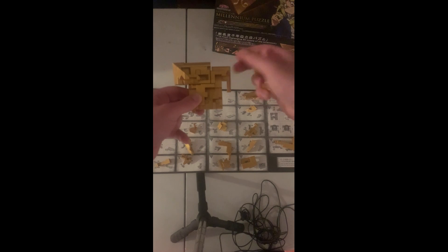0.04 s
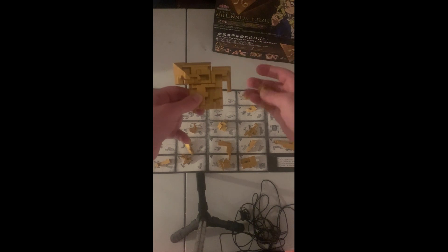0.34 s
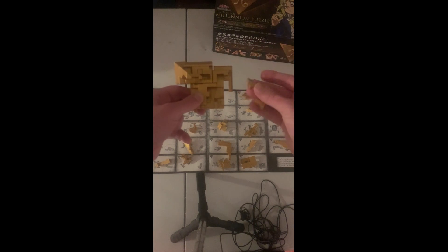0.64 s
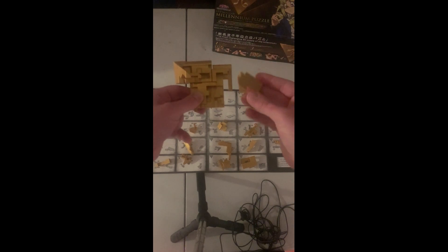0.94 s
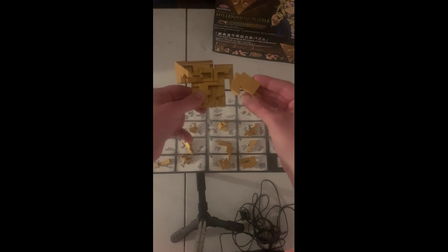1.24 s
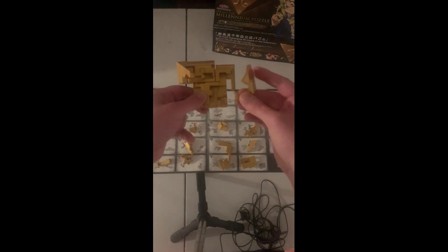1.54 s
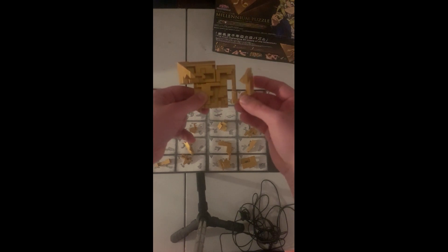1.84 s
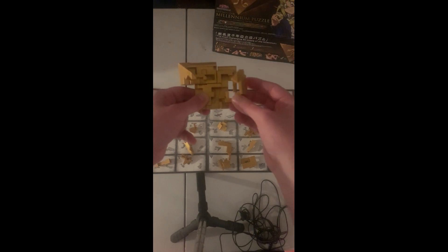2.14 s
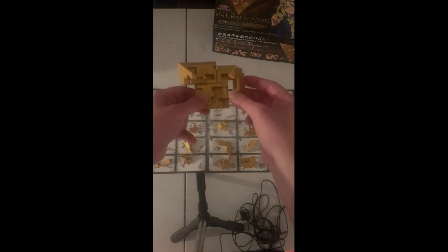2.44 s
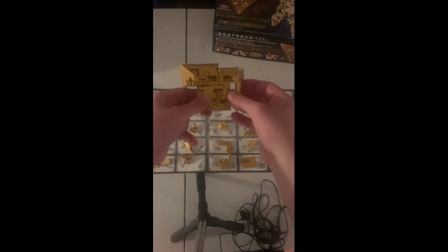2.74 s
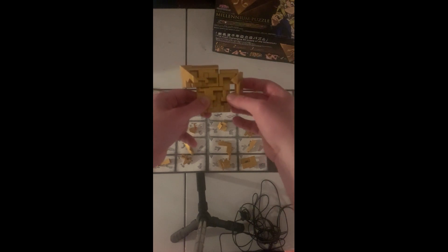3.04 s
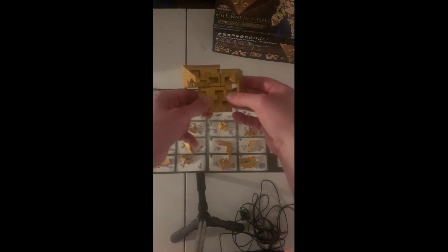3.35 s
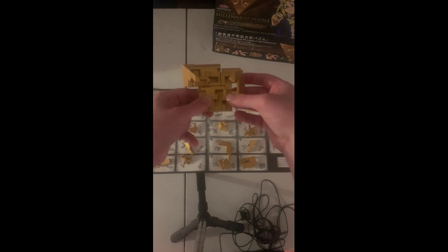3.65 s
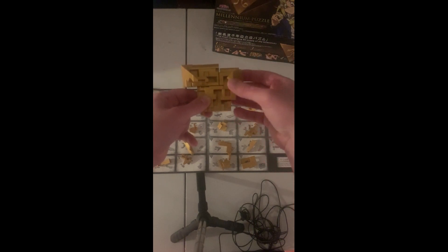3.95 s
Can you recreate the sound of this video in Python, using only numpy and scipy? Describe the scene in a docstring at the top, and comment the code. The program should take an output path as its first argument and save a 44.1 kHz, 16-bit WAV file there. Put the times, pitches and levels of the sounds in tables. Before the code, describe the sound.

A model puzzle piece clicks into an assembly in a small room. For the first two seconds there is only a low, throbbing fan-like hum with rumble and faint hiss, which continues throughout. Light, dry taps come from about 2.3 to 2.6 seconds. A duller, firmer click follows at 2.9 seconds, then quick clicks, a tiny scrape and a bright snap at 3.2 seconds as the piece locks.

```python
"""A small model puzzle piece is felt into its slot on a hand-held assembly: light taps, a dull click as
it seats, then a short scrape and a bright snap as it locks. Each impact excites the damped modes of the
parts; sliding friction drives the same modes with a dense train of tiny slips. A small room adds echoes.
Behind them a slow motor, probably a fan, throbs in harmonics of its turning rate over low rumble and
faint hiss."""
import sys
import numpy as np
from scipy import signal
from scipy.fft import rfft, irfft, next_fast_len
from scipy.io import wavfile
from scipy.ndimage import map_coordinates

SR = 44100
rng = np.random.default_rng(int(sys.argv[2]) if len(sys.argv) > 2 else 0)


def to_wav(s):
    """Save 16-bit WAV."""
    ch = np.atleast_2d(s).T  # columns
    pcm = np.round(np.clip(ch, -1, 1) * 32767)  # PCM
    wavfile.write(sys.argv[1], SR, pcm.astype(np.int16))


N = 176400

# spectra of the building's rumble and the air's hiss (frequency [Hz], relative density [dB])
RUMBLE_SPECTRUM = [(10, -8), (22, -9), (31, 2.5), (42, -15), (55, -3.5), (72, -18), (90, -10.5), (112, -6),
                   (135, -19.5), (200, -30.5), (400, -41.5), (1000, -93)]
HISS_SPECTRUM = [(100, -5), (250, 1), (480, -0.5), (620, -5.5), (740, -5.5), (900, -9.5), (1100, -6.5),
                 (1280, -14), (1600, -18), (2700, -19.5), (4000, -22), (8000, -24), (15500, -27.5)]
# harmonics of the turning rate, from the first up (relative level [dB])
MOTOR_HARMONICS = [-7.5, -11.5, -6.5, -.5, -6, -13.5, -0.5, -6.5, -25.5, -17, -23]
# steady tones of motor and mains (frequency [Hz], level [dB])
WHINE_TONES = [(22.6, -59), (120, -67), (236, -78.5), (240, -80.5), (314, -80), (428, -84), (473, -79),
               (720, -83.5), (766, -82.5), (1050, -87)]
# reverberation time of the room (frequency [Hz], t60 [s])
ROOM_DECAY = [(300, 0.2), (2500, 0.22), (8000, 0.28), (15000, 0.1)]
# normal modes of the assembly (frequency [Hz], relative level [dB], t60 [s])
ASSEMBLY_MODES = [(1612, -12, 0.029), (2135, -2.5, 0.012), (2420, -0.5, 0.018), (2860, -3.5, 0.019),
                  (3450, -5, 0.021), (3930, -4, 0.015), (4400, -17, 0.014), (5630, -7, 0.0076),
                  (7300, -19, .016), (8260, -26.5, 0.18)]
# spectra of the bare contact and the soft knock in the hand (frequency [Hz], relative density [dB])
CRACK_SPECTRUM = [(100, -20), (400, -6), (900, -8), (1300, -10), (2300, -1), (3000, 0), (4000, -2),
                  (7000, -7), (11000, -15), (16000, -24)]
THUD_SPECTRUM = [(100, -15), (330, 0.5), (600, -10.5), (1000, -8.5), (1400, -26), (3000, -57)]
# the piece rubbing along its slot (time [s], length [s], level [dB], tilt [dB/octave], thud gain [dB])
SLIDES = [(2.16, 0.036, -80.5, -9, -14), (2.872, .032, -67, -8, 6), (3.166, 0.0092, -53.5, -2.5, -14),
          (3.188, .018, -58.5, 0, -9)]
# impacts of piece on assembly
# (time [s], gain [dB], tilt [dB/octave], favoured frequency [Hz], its lift [dB], thud gain [dB])
IMPACTS = [(2.2908, -58, -2, 3700, 7, -16), (2.3395, -59.5, 2, 5900, 10, -14),
           (2.3440, -52, -1, 2340, 3.5, -14), (2.4245, -63.5, -2, 3500, 7, -11),
           (2.5020, -51.5, -2.5, 4000, 6, -14), (2.5165, -54.5, 0.5, 3380, 10.5, -9),
           (2.5195, -52, 0.5, 2000, 10, -4), (2.5350, -61, -3, 2400, 9.5, -22),
           (2.5480, -62, -8, 2400, 8, -14), (2.6023, -56.5, -6, 2350, 13, -14),
           (2.6225, -65, -4, 2450, 7, -14), (2.6475, -62, -6, 3000, 5, -16),
           (2.9036, -43, -2.5, 2260, 11, -12), (3.1655, -50.5, 2, 2450, 3, -18),
           (3.1722, -42, 0, 1550, 12.5, -14.5), (3.2037, -37, 2, 4660, 4.5, -27)]

RUMBLE_DB, HISS_DB = -51.5, -65.5
TURN_HZ, THROB_DELAY_S, THROB_SCATTER_RAD = 16.43, 0.0515, 0.68
MOTOR_DB, MOTOR_WAVER_DB, WHINE_DRIFT_RAD = -52.5, 0.75, 0.98
TAIL_DB, TAIL_RISE_S, ECHOES_DB, LATEST_ECHO_S = -9, 0.0047, -8.5, 0.010
PIVOT_HZ, FAVOUR_OCTAVES = 2750, 0.29
RING_DB, MODE_SCATTER_DB, ATTACK_S = -6.5, 1.5, 0.00029
CRACK_DB, CRACK_T60_S, THUD_T60_S = -5, 0.011, 0.037
SLIPS_PER_S, SLIP_SPREAD_DB = 1800, 2.5
BAND_LIMIT_HZ = 15850


def amp(db):
    """Amplitude grows tenfold for every 20 dB."""
    return 10 ** (np.asarray(db) / 20)


def along(points, hz):
    """Interpolation of (frequency, value) points on a logarithmic frequency axis."""
    freqs, values = np.transpose(points)
    return np.interp(np.log(hz + 1), np.log(freqs + 1), values)


def wobble(knots_per_s):
    """Spline interpolation between random knots gives a smooth fluctuation."""
    knots = rng.standard_normal(int(N * knots_per_s / SR) + 4)
    return map_coordinates(knots, [np.arange(N) * knots_per_s / SR])


def filtered(x, response):
    """A linear filter multiplies the spectrum by its frequency response."""
    size = next_fast_len(len(x) + 8192)
    return irfft(rfft(x, size) * response(np.fft.rfftfreq(size, 1 / SR)), size)[:len(x)]


def noise(spectrum, size):
    """Spectral shaping turns white noise into coloured noise, scaled to rms 1."""
    coloured = filtered(rng.standard_normal(size), lambda hz: amp(along(spectrum, hz)))
    return coloured / np.sqrt(np.mean(coloured ** 2) + 1e-20)


def add(track, start_s, sound):
    """Superposition: a sound adds to the track from its start time on."""
    part = track[round(start_s * SR):][:len(sound)]
    part += sound[:len(part)]


def background():
    """Stationary broadband noise: low rumble of the building and a soft hiss of air."""
    return amp(RUMBLE_DB) * noise(RUMBLE_SPECTRUM, N) + amp(HISS_DB) * noise(HISS_SPECTRUM, N)


def motor():
    """Harmonics roughly in phase reinforce once a turn as a throb; faint tones waver beside it."""
    t = np.arange(N) / SR
    angle = 2 * np.pi * TURN_HZ * (t - THROB_DELAY_S)
    throb, whine = np.zeros(N), np.zeros(N)
    for order, db in enumerate(MOTOR_HARMONICS, 1):
        level = amp(MOTOR_DB + db + MOTOR_WAVER_DB * wobble(3.2))
        throb += level * np.cos(order * angle + THROB_SCATTER_RAD * rng.normal())
    for hz, db in WHINE_TONES:
        phase = 2 * np.pi * (hz * t + rng.random())
        whine += amp(db) * np.sin(phase + WHINE_DRIFT_RAD * wobble(4.96))
    return np.sqrt(2) * (throb + whine)  # rms to peak amplitude


def in_room(sound):
    """Convolution with an impulse response: direct sound, echoes off table and walls, diffuse tail."""
    hz, t, spectrogram = signal.stft(rng.standard_normal(SR // 3), SR, nperseg=256)
    decay = amp(-60 * t / along(ROOM_DECAY, hz)[:, None])
    _, tail = signal.istft(spectrogram * decay, SR, nperseg=256)
    tail *= 1 - np.exp(-np.arange(len(tail)) / SR / TAIL_RISE_S)
    response = amp(TAIL_DB) * tail / np.linalg.norm(tail)
    delays = (SR * LATEST_ECHO_S * rng.uniform(0.15, 1, size=8)).astype(int)
    response[delays] += amp(ECHOES_DB) * rng.choice([-1, 1], len(delays)) / np.sqrt(len(delays))
    response[0] = 1  # direct path
    return signal.fftconvolve(sound, response)


def knock(tilt_db, thud_db, favoured_hz=PIVOT_HZ, lift_db=0):
    """An impact sets the modes into damped free vibration, along with a noisy crack and thud."""
    def colour_db(hz):
        """Harder contacts tilt the spectrum upward; the spot struck favours one frequency region."""
        tilt = tilt_db * np.log2(np.maximum(hz, PIVOT_HZ / 2) / PIVOT_HZ)
        octaves_off = np.log2((hz + 1) / favoured_hz)
        return tilt + lift_db * np.exp(-(octaves_off / FAVOUR_OCTAVES) ** 2)

    t = np.arange(SR // 6) / SR
    ring = np.zeros(len(t))
    for hz, db, t60 in ASSEMBLY_MODES:
        onset_db = db + colour_db(hz) + rng.normal(0, MODE_SCATTER_DB)
        detuned_hz = hz * rng.normal(1, 0.008)
        ring += amp(onset_db - 60 * t / t60) * np.sin(2 * np.pi * (detuned_hz * t + rng.random()))
    crack = filtered(noise(CRACK_SPECTRUM, len(t)), lambda hz: amp(colour_db(hz)))
    crack *= amp(CRACK_DB - 60 * t / CRACK_T60_S)
    thud = noise(THUD_SPECTRUM, len(t)) * amp(thud_db - 60 * t / THUD_T60_S)
    attack = 1 - np.exp(-t / ATTACK_S)
    return (amp(RING_DB) * ring + crack + thud) * attack


def scrapes():
    """Stick-slip friction: as the piece slides, each tiny random slip rings the parts like an impact."""
    track = np.zeros(N)
    t = np.arange(SR // 3) / SR
    for start_s, length_s, db, tilt_db, thud_db in SLIDES:
        slipping = rng.random(len(t)) < SLIPS_PER_S / SR
        strength = amp(SLIP_SPREAD_DB * rng.standard_normal(len(t)))
        slips = slipping * strength * rng.choice([-1, 1], len(t))
        stroke = np.sqrt(np.abs(np.sin(np.pi * np.minimum(t / length_s, 1))))
        rub = signal.fftconvolve(slips * stroke, knock(tilt_db, thud_db))
        rub *= np.sqrt(length_s * SR) / np.linalg.norm(rub)  # energy proportional to length
        add(track, start_s, amp(db) * in_room(rub))
    return track


def clicks():
    """Impulsive excitation: the piece taps, seats and snaps home, one knock for each impact."""
    track = np.zeros(N)
    for start_s, db, tilt_db, favoured_hz, lift_db, thud_db in IMPACTS:
        add(track, start_s, amp(db) * in_room(knock(tilt_db, thud_db, favoured_hz, lift_db)))
    return track


def scene():
    """Sound pressures add: the puzzle and the room's steady sound share one channel."""
    return (clicks() + scrapes() + motor() + background())[None]


def record(dry):
    """An ideal low-pass filter removes everything above the band limit."""
    return np.array([filtered(channel, lambda hz: hz < BAND_LIMIT_HZ) for channel in dry])


dry = scene()
out = record(dry)
to_wav(out)
```